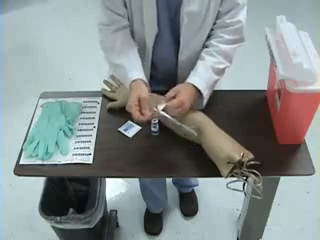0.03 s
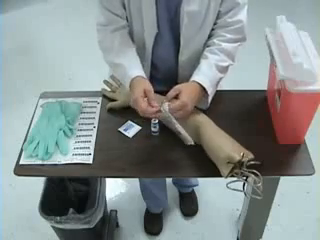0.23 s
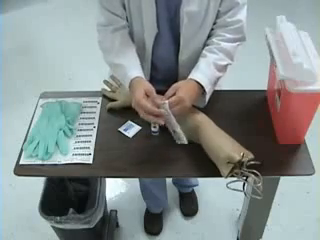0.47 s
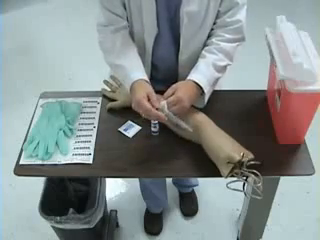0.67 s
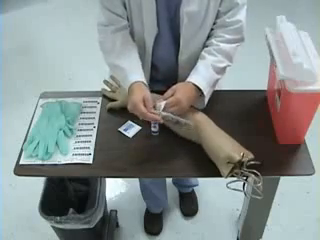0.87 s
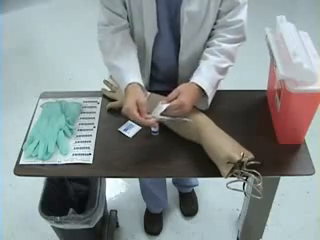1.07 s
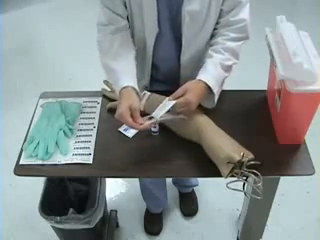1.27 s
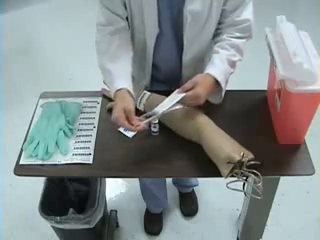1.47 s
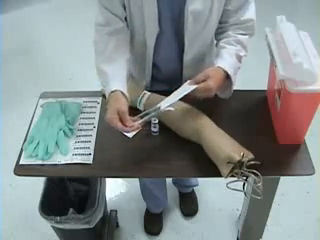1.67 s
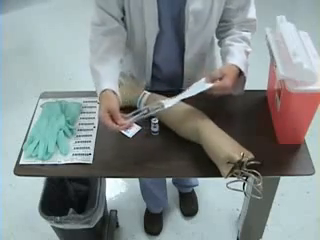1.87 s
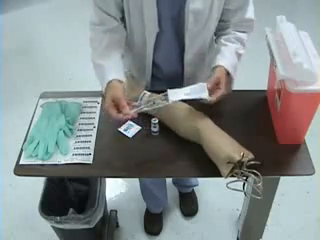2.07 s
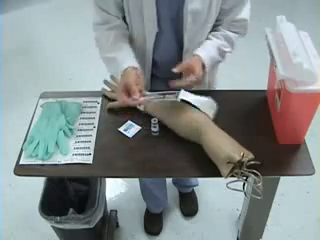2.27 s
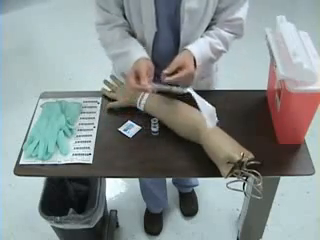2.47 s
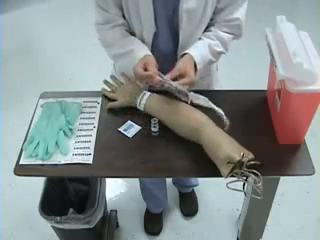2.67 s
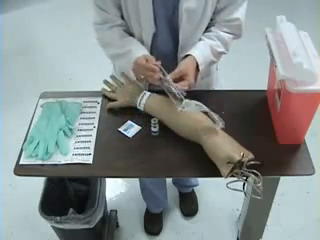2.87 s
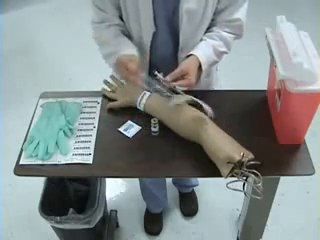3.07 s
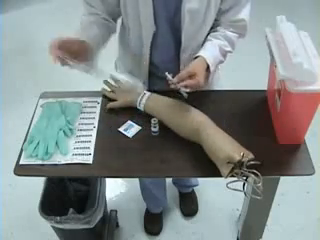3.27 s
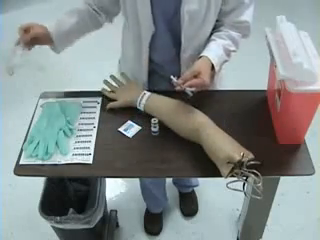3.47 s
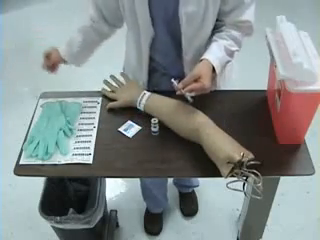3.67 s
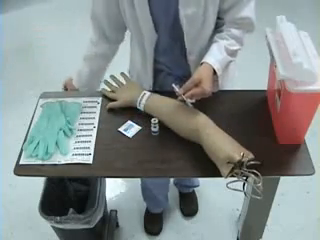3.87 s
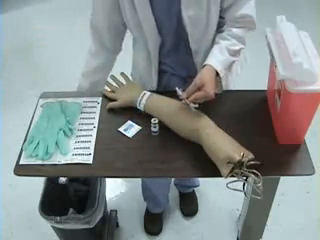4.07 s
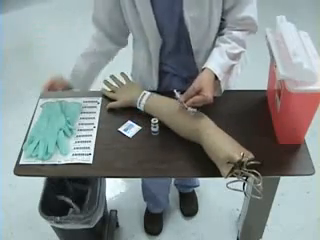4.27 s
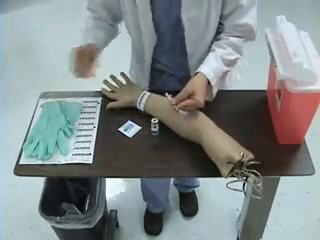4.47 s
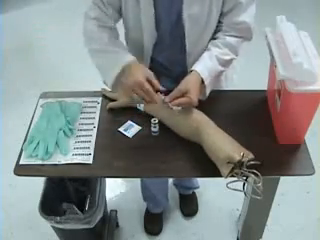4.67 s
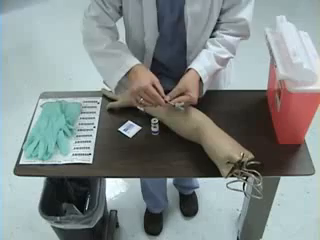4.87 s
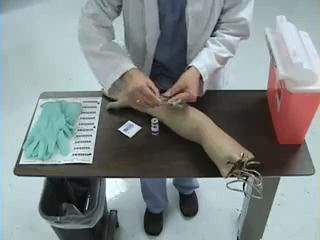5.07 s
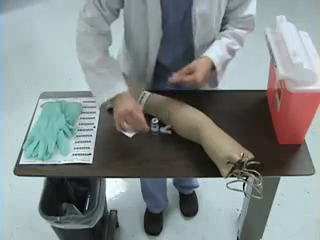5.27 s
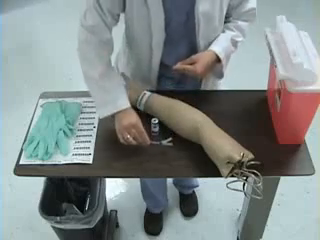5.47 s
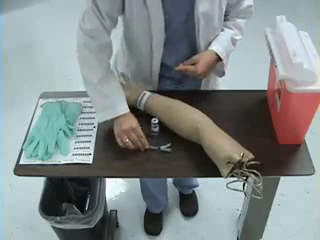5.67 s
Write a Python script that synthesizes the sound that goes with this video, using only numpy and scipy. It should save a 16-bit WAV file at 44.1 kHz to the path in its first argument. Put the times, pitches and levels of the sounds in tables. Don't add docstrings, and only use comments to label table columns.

```python
import sys
import numpy as np
from scipy import signal
from scipy.fft import rfft, irfft, next_fast_len
from scipy.io import wavfile
from scipy.ndimage import uniform_filter1d, map_coordinates

SR = 44100
rng = np.random.default_rng(int(sys.argv[2]) if len(sys.argv) > 2 else 0)


def unload_wav(signal):
    wavfile.write(
        sys.argv[1],
        SR,
        np.round(np.clip(np.atleast_2d(signal).T, -1, 1) * 32767).astype(np.int16),
    )


def ratio(d):
    e = np.asarray(d, float) / 20
    return 10 ** e


N = 252428


def unit(x):
    return x / np.sqrt(np.mean(x ** 2, -1, keepdims=True) + 1e-20)


def along(points, hz):
    point_hz, value = np.transpose(points)
    return np.interp(np.log(hz + 1), np.log(point_hz + 1), value)


def curves(rows):
    s, *columns = np.transpose(rows)
    return [np.interp(np.arange(N) / SR, s, column, left=-120, right=-120) for column in columns]


def wobble(rate):
    knots = rng.standard_normal(int(N * rate / SR) + 4)
    return map_coordinates(knots, [np.arange(N) * rate / SR])


def filtered(x, response):
    n = x.shape[-1]
    padded = next_fast_len(n + 4096)
    return irfft(rfft(x, padded) * response(np.fft.rfftfreq(padded, 1 / SR)), padded)[..., :n]


def resonance(f, hz, width_hz):
    return 1j * f * width_hz / (hz * hz - f * f + 1j * f * width_hz)


def noise_like(spectrum):
    return unit(filtered(rng.standard_normal(N), spectrum))


# pitch_hz, level_db
AIR = [(12, -54), (20, -2.5), (86, -7.5), (155, -8.5), (268, -8.5), (417, -19.5), (475, -16), (701, -22),
       (758, -24), (841, -22), (2850, -36), (8040, -40.5), (9900, -42.5), (12900, -96), (21800, -120)]
# pitch_hz, width_hz, level_db
DUCT = [(84.2, 16, -54), (182.9, 18.3, -58), (234.3, 33, -64)]
# pitch_hz, width_hz, level_db
WHINE = (7867, 120, -74.5)
AIR_DB = -48


def ventilation():
    sound = ratio(AIR_DB + 0.25 * wobble(3.03)) * noise_like(lambda f: ratio(along(AIR, f)))
    for hz, width_hz, db in [*DUCT, WHINE]:
        sound += ratio(db) * noise_like(lambda f: resonance(f, hz, width_hz) ** 2)
    return sound


# delay_s, level_db
ECHOES = [(.0018, -11), (.0058, -15), (.0148, -16), (.0212, -18), (.029, -24)]


def echoes(x):
    answer = np.zeros((1, SR // 3))
    for delay_s, db in ECHOES:
        answer[0, round(delay_s * SR)] = ratio(db - 1.5)
    answer = filtered(answer, lambda f: 1 / (1 + 1j * f / 5000))
    answer[0, 0] = 1
    return signal.fftconvolve(x, answer, axes=1)


# pitch_hz, decay_s
ROOM = [(500, 0.97), (1500, 0.11), (3500, 0.26), (9000, 0.2)]


def tails(count):
    hz, t, z = signal.stft(rng.standard_normal((count, SR // 3)), SR, nperseg=256)
    fading = ratio(-60 * t / along(ROOM, hz)[:, None])
    tail = signal.istft(z * fading, SR, nperseg=256)[1]
    tail = tail * (1 - np.exp(-np.arange(tail.shape[1]) / SR / 0.005))
    return tail / np.linalg.norm(tail, axis=1, keepdims=True)


def room(x, wet_db):
    tail = signal.fftconvolve(x, tails(count=1), axes=1)[0, :N]
    return echoes(x)[0, :N] + ratio(wet_db) * tail


# start_s, peak_db
THUMPS = [
    (1.2635, -27),
    (1.9915, -23),
]


def thumps():
    t = np.arange(N) / SR
    sound = np.zeros(N)
    for start_s, db in THUMPS:
        u = np.maximum(t - start_s, 0) / .001
        sound += ratio(db) * (1 - u) * np.exp(-u) * (1 - np.exp(-6 * u)) * 2
    return sound


def grains(per_second, spread_db, smooth):
    clumps = ratio(1.6 * wobble(30))
    happens = rng.random(N) < per_second * clumps / SR
    slips = happens * ratio(spread_db * rng.exponential(size=N))
    bursts = np.convolve(slips, np.exp(-np.arange(96) / 16))[:N] * rng.standard_normal(N)
    return unit(unit(bursts) + smooth * rng.standard_normal(N))


# start_s, length_s, level_db, pitch_hz
SWISH = [(0.02, 0.066, -39.5, 2400), (1.78, 0.048, -49, 3230), (4.202, 0.086, -59, 3000),
         (1.992, 0.043, -43, 2960), (4.72, 0.2, -64, 5960), (1.689, 0.13, -46, 920),
         (1.883, 0.16, -44, 1470), (3.088, 0.17, -61, 6100), (3.264, 0.19, -61, 3520),
         (3.543, 0.23, -64.5, 3140), (5.254, 0.65, -64.5, 1800)]


def swish():
    rub = grains(900, spread_db=1.2, smooth=0.8)
    t = np.arange(N) / SR
    sound = np.zeros(N)
    for s, length, db, hz in SWISH:
        swell = np.interp(t, [s, s + 0.27 * length, s + length], [0, 1, 0])
        sound += ratio(db) * swell * unit(filtered(rub, lambda f: resonance(f, hz, 1.65 * hz) ** 2))
    return sound


# start_s, level_db
SLIDE = [
    (4.42, -94),
    (4.428, -78),
    (4.47, -56),
    (4.49, -37.5),
    (4.528, -52),
    (4.62, -56.5),
    (4.676, -95),
    (4.72, -74),
]
# pitch_hz, level_db
LINER = [(400, -46), (900, -10.5), (2000, -7.5), (4000, -9.5), (9000, -7), (13000, -8)]


def slide():
    grit = grains(1500, spread_db=2.5, smooth=0.7)
    rub = filtered(grit, lambda f: ratio(along(LINER, f)))
    return ratio(curves(SLIDE)[0] + 1.5) * unit(rub)


# start_s, level_db, brightness_db
HANDLING = [(0, -52, 7), (.1, -46, 5), (.2, -55, -10), (.45, -50.5, 11.5), (.62, -55, -1.5),
            (.95, -58, 6.5), (1.1, -49, -1), (1.2, -43, 0), (1.4, -44.5, 7), (1.53, -45.5, 5),
            (1.65, -45.5, -6), (2.0, -43.5, 7), (2.25, -58.5, -3), (3.0, -54.5, 4), (3.9, -61, -1),
            (4.75, -59.5, 2), (5.1, -72, 0), (5.73, -55.5, -3)]
# pitch_hz, level_db
CRACKLE = [(300, -15), (600, -3), (1000, -8), (2000, 2.5), (3400, -4), (5000, -4), (8400, -9.5),
           (10200, -10), (13000, -5)]
SETTLE_DB, SETTLE_S = -34.5, 0.016


def crackle():
    level_db, bright_db = curves(HANDLING)
    s, peak_db = creases()[:2, :, 0]
    kicks = np.bincount(np.round(s * SR).astype(int), ratio(peak_db + SETTLE_DB), N)
    settle = signal.lfilter([1], [1, -np.exp(-1 / (SETTLE_S * SR))], kicks)
    slips = grains(1100, spread_db=0.13, smooth=0.18)
    fine = unit(filtered(slips, lambda f: ratio(along(CRACKLE, f))))
    top = filtered(fine, lambda f: resonance(f, 8400, 5000))
    return (ratio(level_db - 8) + settle) * (fine + (ratio(bright_db) - 1) * top)


# start_s, peak_db, ring_hz, treble_db
PINCH = [(0.0205, -9.5, 4860, 0.5), (.0250, -11.5, 3400, -7), (0.032, -22, 5430, -20),
         (0.048, -16.5, 2240, -10), (0.0618, -19.5, 2900, -22), (0.0676, -19.5, 2360, -17),
         (0.164, -33.5, 4750, -1), (.2318, -32.5, 2620, -5), (0.2458, -32.5, 2230, -7.5),
         (0.3618, -37, 2600, -30), (0.3989, -17.5, 4770, -3.5), (.429, -17, 2840, -13.5),
         (0.4336, -25, 2850, -16), (0.5525, -33, 2580, -25), (0.557, -30.5, 2480, -17),
         (.566, -22, 5100, -22), (.647, -29.5, 3540, -17), (0.7633, -36.5, 2820, -30),
         (0.813, -29, 5070, -27), (0.9212, -38.5, 2800, -18), (0.9353, -38, 2670, -4),
         (0.9388, -25.5, 3040, -8.5)]
# start_s, peak_db, ring_hz, treble_db, paper_body_db
PEEL = [(.9949, -23, 4460, -27, -9), (1.0025, -17.5, 2320, -25, -14), (1.0407, -13, 4330, -12.5, -13),
        (1.0798, -8.5, 2530, -30, -32), (1.1836, -24.5, 4420, -2, -28), (1.2119, -13, 3380, 0, -6),
        (1.2333, -23, 4100, 9, -16), (1.2629, -6, 3500, -8, -35), (1.2998, -15, 4450, -16, -23),
        (1.3277, -8, 3900, -4, -13), (1.3678, -19.5, 3630, -26, -3), (1.395, -19, 5280, -18, -5),
        (1.4247, -14, 3640, -10, -16), (1.4575, -19, 3550, -13, -1.5), (1.4671, -10.5, 3620, -9, -12.5),
        (1.4802, -13, 2950, -5.5, -15), (1.5428, -26.5, 5200, -4, 2), (1.7095, -20, 4100, -10, -3.5),
        (1.7485, -21, 3600, -19, -3), (1.7955, -12, 3250, -10.5, -9), (1.8628, -29, 5250, 12, -9),
        (1.942, -13, 4040, 7, -5), (1.9845, -13.5, 4520, -1, -2), (1.9908, -3.5, 3350, 0.5, -12)]
# start_s, peak_db, ring_hz, treble_db, paper_body_db
LOOSE = [(2.0925, -30, 2820, -17, -6), (2.0977, -28, 5250, -25, -15), (2.1183, -27, 5400, -6, -1),
         (2.1752, -28.5, 4320, -44, -16), (2.188, -31, 2290, -13, -23), (2.288, -23, 4300, -15, -6.5),
         (2.7759, -33.5, 4600, -30, -11), (2.7853, -34.5, 2330, -16, -6), (2.8639, -20, 3500, -2, -4),
         (2.9513, -24.5, 4600, -5, -2), (3.0118, -27, 2670, -15, -7), (3.1205, -26.5, 4360, 13, -13),
         (3.364, -34, 2900, -7, -6), (3.4847, -38.5, 4820, 11, 6)]
# start_s, peak_db, ring_hz, treble_db
BINNED = [
    (3.529, -42.5, 2270, -20),
    (3.616, -37.5, 3170, -33),
    (3.9643, -33.5, 1940, -26),
    (3.968, -32, 3020, -16),
    (4.2032, -26.5, 2870, -9.5),
    (4.2074, -25, 3220, -3),
    (4.2172, -39, 2800, 4),
    (4.4893, -31, 1800, -15),
]
# start_s, peak_db, ring_hz
TICKS = [(.281, -43, 4740), (0.296, -40.5, 1340), (.587, -40, 4500), (0.679, -43, 4480), (.705, -43, 2840),
         (.907, -41, 5740), (1.13, -26, 3800), (1.341, -36, 4590), (1.492, -26, 3690), (1.793, -17, 3420),
         (1.7962, -16, 3300), (1.895, -34, 1490), (1.9045, -29, 4480), (2.208, -38, 4980),
         (2.3132, -40, 5500), (2.326, -38.5, 3040), (2.344, -44, 1370), (2.459, -43.5, 1610),
         (2.735, -44.5, 3920), (2.750, -45, 2720), (2.993, -39, 2970), (3.078, -40.5, 2890),
         (3.194, -44, 5570), (3.285, -48, 3900), (3.317, -40.5, 2700), (3.374, -49, 2800),
         (3.385, -38.5, 2640), (3.446, -48, 5800), (5.179, -44, 5500)]
PINCH_BODY_DB, BIN_BODY_DB = -17, -16.5
TICK_BODY_DB, TICK_TREBLE_DB = -10.5, -17.5
NEAR_WET_DB, FAR_WET_DB = -13, -3.5


def creases():
    rows = [(*r, PINCH_BODY_DB, NEAR_WET_DB) for r in PINCH]
    rows += [(*r, NEAR_WET_DB) for r in [*PEEL, *LOOSE]]
    rows += [(*r, BIN_BODY_DB, FAR_WET_DB) for r in BINNED]
    rows += [(*r, TICK_TREBLE_DB, TICK_BODY_DB, NEAR_WET_DB) for r in TICKS]
    return np.transpose(rows)[:, :, None]


STRAIN_DB, STRAIN_GROWS = -31, .7
BUILD_S, CLICK = .0004, 1.72
LEAD = 512


def snaps():
    s, peak_db, ring_hz, treble_db, body_db, wet_db = creases()
    strain_db = STRAIN_DB + (STRAIN_GROWS - 1) * peak_db
    t = (np.arange(1024) - LEAD) / SR
    after = np.maximum(t, 0)
    dying = ratio(-60 * after / 0.0048) + ratio(-11 - 60 * after / 0.01)
    release = (1 - np.exp(-(after / BUILD_S) ** 2)) * dying
    strain = ratio(strain_db) * np.exp(-np.abs(t) / 0.0052)
    burst = rng.standard_normal((len(s), 1024)) * (release + strain)
    burst += CLICK * np.sinc((t - BUILD_S) * SR)
    z = rfft(burst)
    burst = irfft(z / np.sqrt(uniform_filter1d(np.abs(z) ** 2, size=36, axis=1)))

    def panel(f):
        ring = resonance(f, ring_hz, 0.68 * ring_hz) ** 2
        whole_sheet = ratio(-19) * resonance(f, 3600, 2000)
        treble = ratio(treble_db) * resonance(f, 8110, 5400) ** 2
        body = ratio(body_db + 1.5) * resonance(f, 893, 1400) ** 2
        return ring + whole_sheet - treble - body

    def energy(v):
        return np.linalg.norm(v, axis=1, keepdims=True)

    direct = filtered(burst, panel)
    direct = direct * ratio(peak_db) / np.abs(direct).max(1, keepdims=True)
    heard = echoes(direct)
    tail = filtered(tails(count=len(s)), lambda f: panel(f) / (1 + 1j * f / 6000))[:, :SR // 3]
    heard[:, LEAD:LEAD + tail.shape[1]] += ratio(wet_db) * tail * energy(direct) / energy(tail)
    where = np.round(s * SR).astype(int) - LEAD + np.arange(heard.shape[1])
    return np.bincount(where.ravel(), heard.ravel(), N)[:N]


def scene():
    rustle = room((crackle() + slide() + swish())[None], wet_db=-0.5)
    return (snaps() + thumps() + rustle + ventilation())[None]


def top_band_gate(x, edge_hz, quiet_db, need_db):
    hz, _, z = signal.stft(x, SR, nperseg=1024)

    def level(low_hz, high_hz):
        band = z[:, (hz > low_hz) & (hz < high_hz)]
        return 10 * np.log10(np.mean(np.abs(band) ** 2, 1) + 1e-14)

    treble, middle = level(8500, 9900), level(1500, 5000)
    bright = treble - middle + .3 * (treble - quiet_db) > need_db
    kept = (treble > quiet_db) & bright
    z = z * ((hz < edge_hz)[:, None] | kept[:, None])
    return signal.istft(z, SR, nperseg=1024)[1][:, :N]


def low_pass(x):
    return signal.sosfilt(signal.butter(12, 12600, fs=SR, output="sos"), x)


# pitch_hz, level_db
TOP_BAND_COLOUR = [(20, 0), (8500, 0), (10000, -5), (10550, -8), (10700, -65), (11350, -65), (11480, -16),
                   (12350, -34), (12480, -70)]


def record(dry):
    heard = filtered(dry, lambda f: ratio(along(TOP_BAND_COLOUR, f)))
    heard = top_band_gate(heard, edge_hz=10080, quiet_db=-88, need_db=-2.5)
    return low_pass(heard)


dry = scene()
out = record(dry)
unload_wav(out)
```